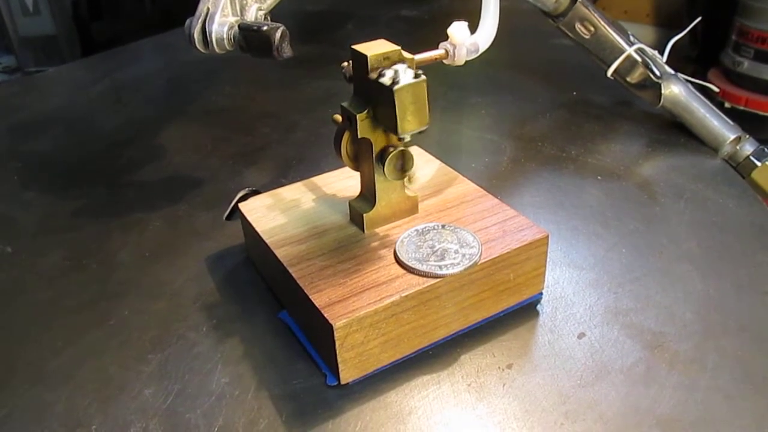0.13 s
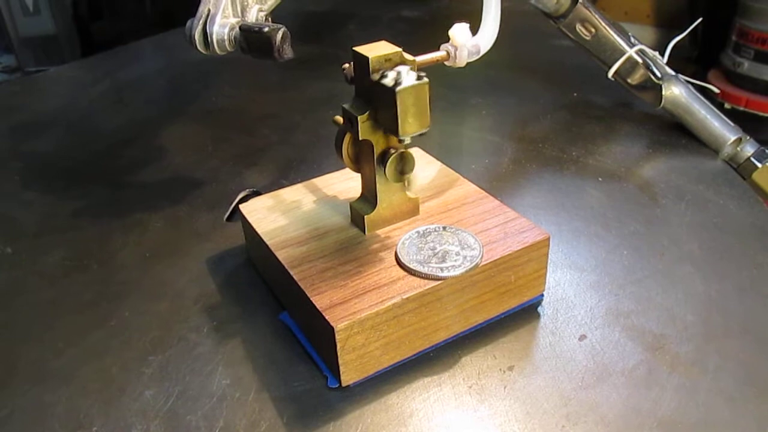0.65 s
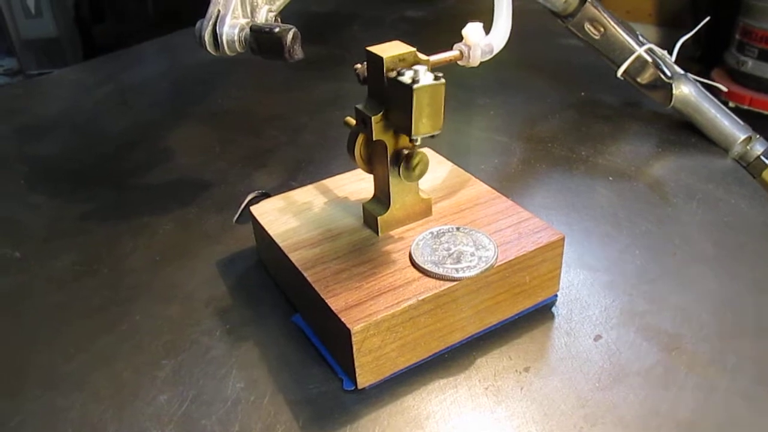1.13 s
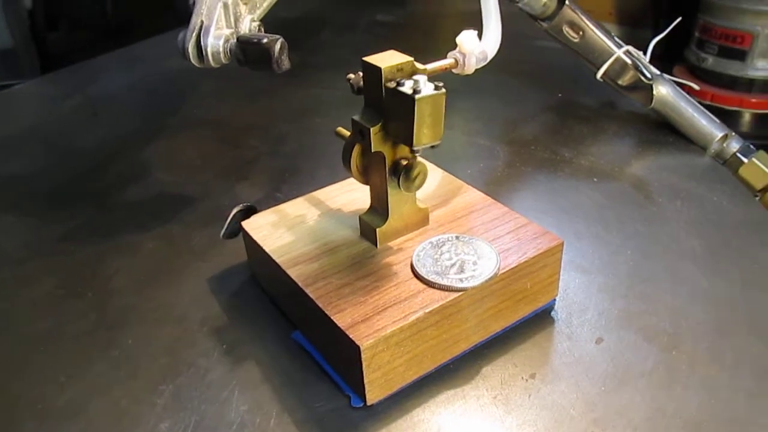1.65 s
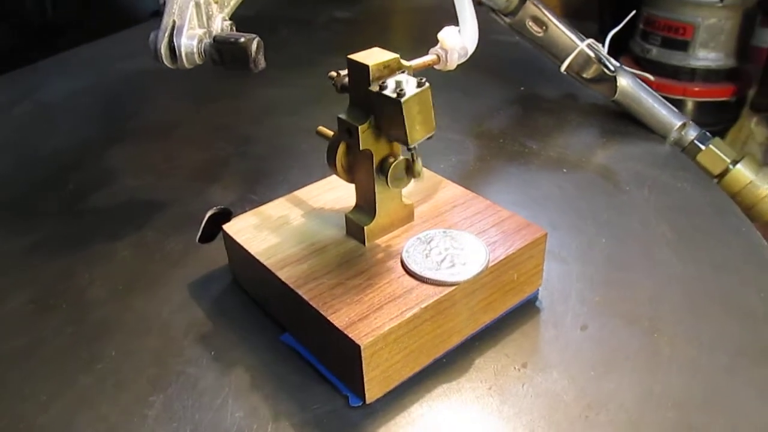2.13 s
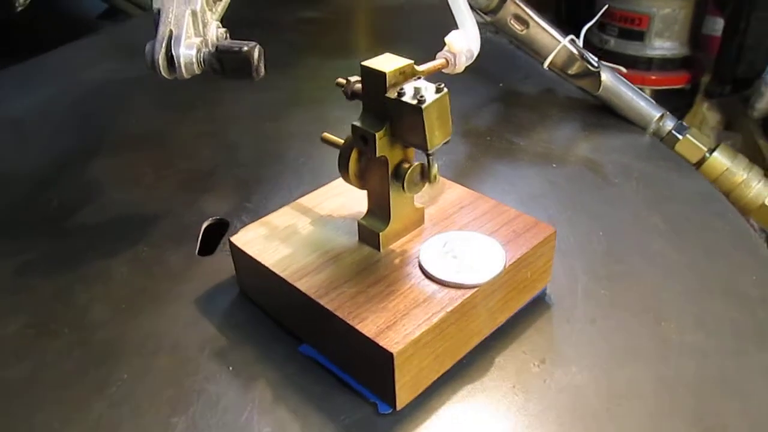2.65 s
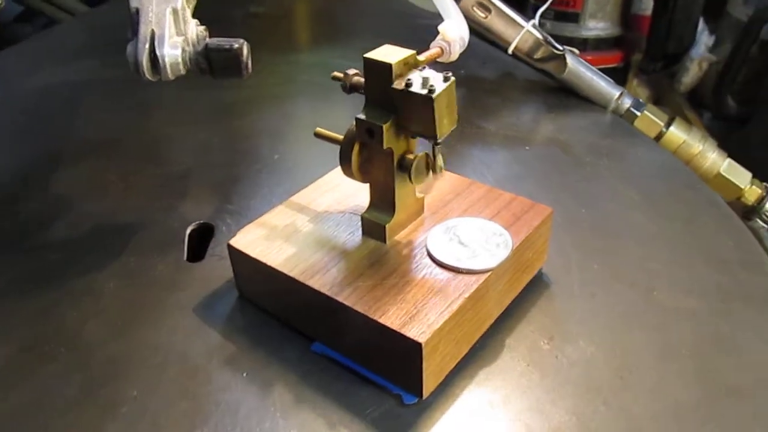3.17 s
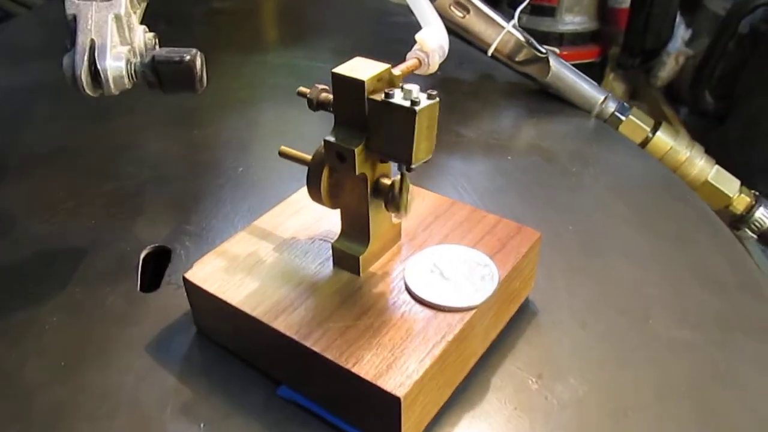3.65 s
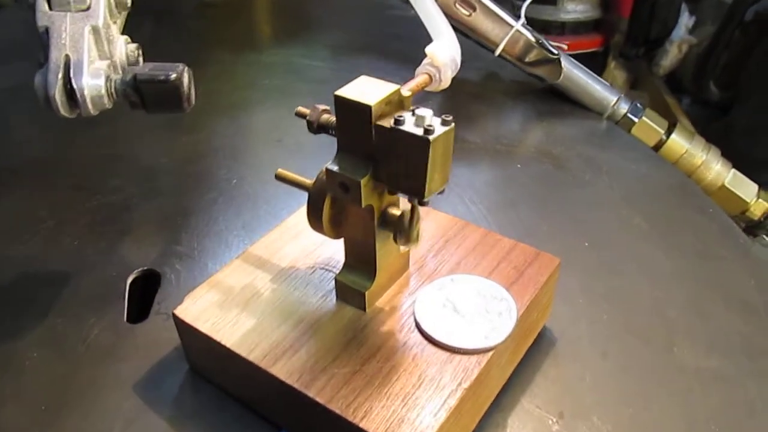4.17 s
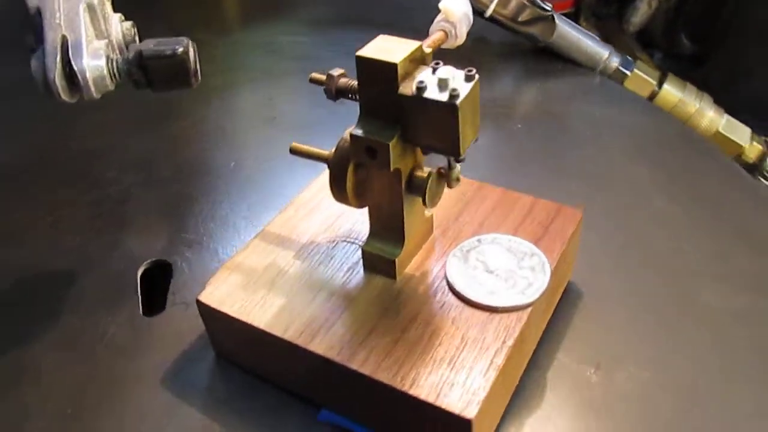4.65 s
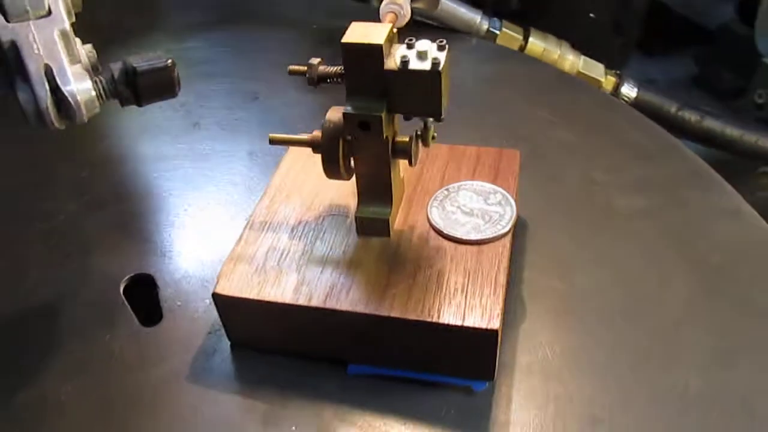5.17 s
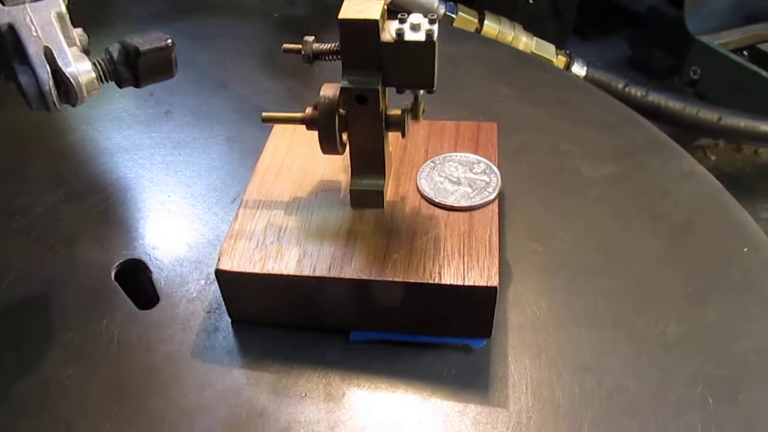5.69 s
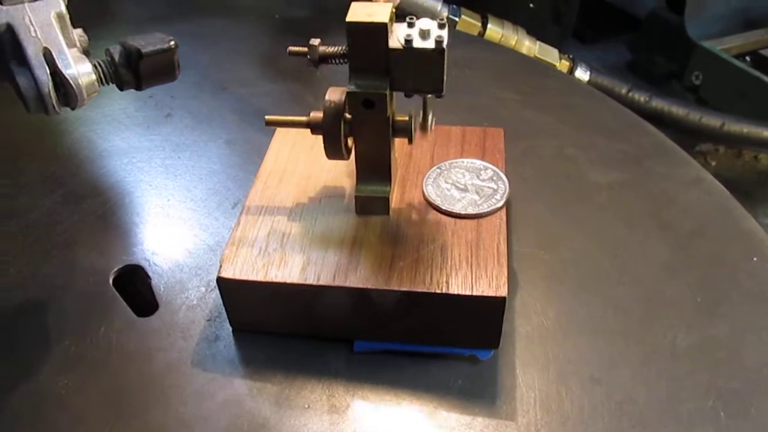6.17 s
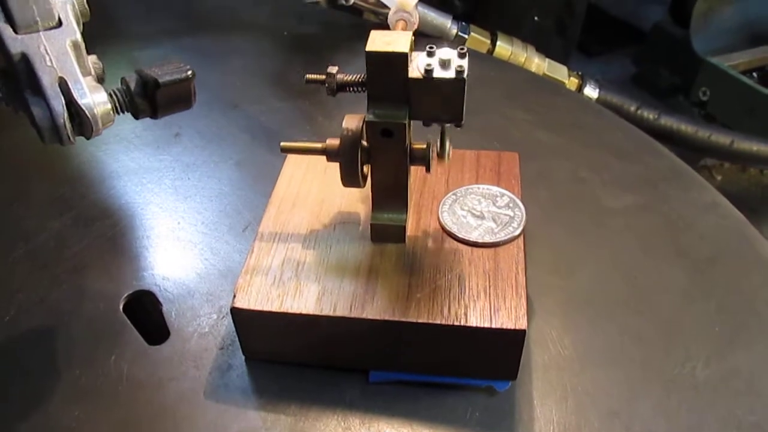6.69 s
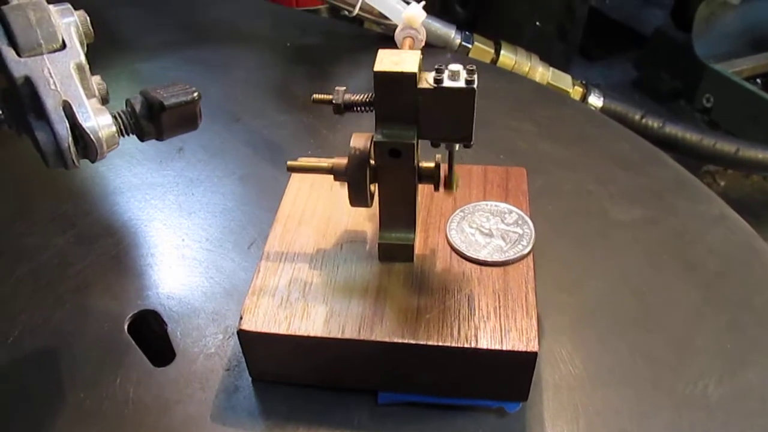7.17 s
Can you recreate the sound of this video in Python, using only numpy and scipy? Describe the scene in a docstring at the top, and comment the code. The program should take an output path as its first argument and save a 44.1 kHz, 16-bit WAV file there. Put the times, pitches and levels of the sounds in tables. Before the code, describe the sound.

Rapid dry clicking and sizzling high-pitched air exhaust from a miniature brass engine on a wood block, steady throughout, with quiet low room rumble.

```python
"""From the start a tiny oscillating-cylinder engine on a wooden block runs on compressed air, near ten
turns a second: noise hisses from its ports in crank-timed puffs, and struck modes ring at three knocks
a turn, some standing out. Under it lie room noise, mains hum sines, a resonant rumble and a faint far motor.
The listener walks from near the cylinder side past a corner towards the front. From 3.3 s four dull
bumps ring; from 4.2 s the motor, two orders over a noise roar, speeds up as the rumble fades."""
import sys
import numpy as np
from scipy import signal
from scipy.fft import rfft, irfft, next_fast_len
from scipy.io import wavfile
from scipy.ndimage import uniform_filter1d, map_coordinates

SR = 44100
rng = np.random.default_rng(int(sys.argv[2]) if len(sys.argv) > 2 else 0)


def waveform_to_disk(signal):
    """Save audio, clipped to [-1, 1], as 16-bit WAV at the path in sys.argv[1]."""
    frames = np.transpose(np.atleast_2d(signal))
    scaled = np.clip(frames, -1, 1) * 32767
    samples = np.round(scaled).astype(np.int16)
    wavfile.write(sys.argv[1], SR, samples)


def invert_db(level):
    """Linear amplitude ratio for a level in decibels (20 dB per decade), elementwise."""
    return 10 ** (np.asarray(level, dtype=float) / 20)


N = 322371


def time_s():
    """Seconds of every sample."""
    return np.arange(N) / SR


def rms_one(x):
    """Scale to rms 1."""
    return x / np.sqrt(np.mean(x ** 2) + 1e-20)


def in_time(rows):
    """Columns of a curve at every sample."""
    s, *columns = np.transpose(rows)
    return [np.interp(time_s(), s, c) for c in columns]


def grid_hz():
    """Frequencies of the FFT grid."""
    return np.fft.rfftfreq(next_fast_len(N), 1 / SR)


def at_hz(points):
    """A spectrum table on the FFT grid, interpolated over log frequency."""
    hz, value = np.transpose(points)
    return np.interp(np.log(grid_hz() + 1), np.log(hz + 1), value)


def shaped(x, response):
    """Filter by a response on the FFT grid."""
    return irfft(rfft(x, next_fast_len(N)) * response, next_fast_len(N))[..., :N]


def drift(rate_hz):
    """Slow chance of spread 1: noise through a double one-pole lowpass."""
    r = np.exp(-2 * np.pi * rate_hz / SR)
    return rms_one(signal.lfilter([1], [1, -2 * r, r * r], rng.standard_normal(N + SR))[SR:])


def ring(x, hz, t60_s):
    """A two-pole mode: a unit click sets a decaying sine of height 1 ringing."""
    r, w = invert_db(-60 / (t60_s * SR)), 2 * np.pi * hz / SR
    return signal.lfilter([0, np.sin(w)], [1, -2 * r * np.cos(w), r * r], x + 1e-18)


def clicks(s, size):
    """Unit clicks of given sizes at given seconds."""
    out, at = np.zeros(N), np.round(np.asarray(s) * SR).astype(int)
    inside = (at >= 0) & (at < N)
    np.add.at(out, at[inside], size[inside])
    return out


# Left-right likeness. Each row: frequency in Hz, likeness 0-1.
LIKENESS = [(40, 0.8), (130, 0.96), (290, 0.9), (640, 0.69), (1400, 0.77), (3100, 0.97), (5000, 0.74),
            (8000, 0.93), (15000, 0.9)]


def loosen(a, b):
    """Mix two unrelated signals as mid and side to a pair whose likeness follows the table."""
    alike = np.clip(at_hz(LIKENESS), 0, 1)
    mid = shaped(a, np.sqrt((1 + alike) / 2))
    side = shaped(b, np.sqrt((1 - alike) / 2))
    return mid + side * [[1], [-1]]


# Listener. Each row: time in seconds, bearing (0 cylinder side, 1 corner, 2 front), hiss rms in dB.
WALK = [(0, 0.26, -20), (1, 0.21, -20.5), (2, 0.31, -21), (2.6, 0.36, -20.5), (3.3, 0.51, -20),
        (4, 0.98, -20.5), (4.6, 1.04, -19.5), (5.2, 1.5, -19.5), (5.8, 1.6, -19.5), (6.5, 1.63, -19.5),
        (7.31, 1.67, -20)]
# Left minus right, a list per bearing. Each row: frequency in Hz, difference in dB.
LEFT_DB = [
    [(60, 2), (99, 2), (160, -1), (270, -3), (450, 0), (740, -1), (1220, 1.5), (2010, -6), (3330, 0),
     (5500, -2), (9080, 5), (15000, -1)],
    [(60, -1), (99, -5), (160, -2.0), (270, 1), (450, -2.5), (740, 0), (1220, 1.5), (2010, -7), (3330, -4),
     (5500, 0.5), (9080, 4), (15000, 1)],
    [(60, 6), (99, -17), (160, -25), (270, -16), (450, 5), (740, -4), (1220, -2), (2010, -10.5), (3330, -3),
     (5500, -2.5), (9080, 2.0), (15000, -2)],
]
# Phase lead of left over right, a list per bearing. Each row: frequency in Hz, lead in radians.
LEFT_LEADS = [
    [(0, 2.1), (5250, 0.38), (5770, -3), (6550, -0.1), (9730, 0.79), (10900, 0.4), (12800, 1), (16100, 1.5)],
    [(0, 0.063), (1890, -0.57), (5000, 0.88), (5430, -0.024), (9560, 0.8), (10300, 0.94), (10900, 0.28),
     (16100, 0.19)],
    [(0, 0.074), (1720, -0.29), (3100, 0.64), (8010, 0.36), (9470, 0.83), (10100, -1.2), (10700, -0.75),
     (16100, -0.4)],
]


def heard_from_walk(pair, colours):
    """Each bearing has its own colour, balance and lead; the walk fades between them."""
    bearing = np.clip(in_time(WALK)[0], 0, 2)
    spectrum = rfft(pair, next_fast_len(N))
    out = 0
    for k, colour in enumerate(colours):
        side = invert_db(at_hz(LEFT_DB[k]) / 2) * np.exp(.5j * at_hz(LEFT_LEADS[k]))
        view = irfft(spectrum * colour * np.array([side, 1 / side]), next_fast_len(N))[:, :N]
        out = out + np.clip(1 - abs(bearing - k), 0, 1) * view
    return out


# Crank passing top centre, every fifth turn. Each entry: time in seconds.
CRANK_S = [0.012, 0.5348, 1.0566, 1.5756, 2.092, 2.6127, 3.1363, 3.6642, 4.1883, 4.7044, 5.2206, 5.7334,
           6.2477, 6.768, 7.2862]
TURNS_PER_MARK = 5


def top_centres():
    """Seconds at which each turn begins, smooth through the marks, with one more turn at either end."""
    marks = np.r_[2 * CRANK_S[0] - CRANK_S[1], CRANK_S, 2 * CRANK_S[-1] - CRANK_S[-2]]
    index = np.arange(len(marks))
    steady = np.polyval(np.polyfit(index, marks, 1), index)
    at = 1 + np.arange(-1, (len(CRANK_S) - 1) * TURNS_PER_MARK + 2) / TURNS_PER_MARK
    wander = map_coordinates(marks - steady, [at], order=3, mode="nearest")
    return np.interp(at, index, steady) + wander


def echoes(rows):
    """Response of the direct sound plus a few early reflections, per channel."""
    return 1 + sum(np.outer([left, right], np.exp(-2j * np.pi * grid_hz() * ms / 1000))
                   for ms, left, right in rows)


# Puffs at the ports. Each row: centre in turns, length in turns, pitch at centre in Hz,
# glide in octaves per turn, width in octaves.
PUFFS = [(-.03, .04, 9600, 8, .22), (.03, .08, 10800, 0, .3), (.04, .012, 5300, 0, .14),
         (.165, .013, 9000, 0, .5), (.56, .045, 10500, 0, .35), (.59, .013, 12500, 0, .45),
         (.72, .025, 6600, -2, .2), (.7, .07, 10500, 0, .3), (.8, .13, 14500, 0, .3),
         (.85, .12, 5600, 0, .4)]
# Mean puff strength. Each entry: dB over the steady leak.
PUFF_DB = [7.7, 5.3, 4.5, 6.7, 4.2, 4.2, 4.1, 1.4, 0.33, 0.26]
# Hiss colour, a list per bearing. Each row: frequency in Hz, relative level in dB.
HISS = [
    [(2350, -47), (4000, -19), (4850, -22.5), (6100, -19), (7190, -12), (7920, -4), (9030, -1),
     (10200, 1.5), (10500, -1), (11000, -4.5), (11900, -5), (13200, -18.5), (14800, -12.5), (15600, -22)],
    [(2350, -35.5), (4000, -17.5), (4280, -23.5), (4830, -24.5), (5200, -22), (5440, -18), (6530, -6),
     (8060, -6.5), (8580, -5), (9720, -2.5), (10400, -0.5), (11000, -1), (12700, -5), (15600, -12.5)],
    [(2350, -45), (4000, -16), (5020, -27), (5380, -13.5), (5730, -19), (6340, -9), (6870, -8),
     (8240, -3.5), (9240, -5.5), (9950, 0), (10600, 1.5), (13900, -11), (15600, -17)],
]
# Block, frame and bench reflecting the hiss, a list per bearing.
# Each row: delay in ms, share left, share right (of the direct sound).
REFLECTIONS = [
    [(0.405, 0.15, 0.02), (0.68, 0.18, 0.17), (1.015, -0.01, -0.18), (1.26, 0.03, 0.13)],
    [(0.61, 0.06, -0.05), (0.76, -0.17, -0.05), (0.96, -0.07, -0.03), (1.355, 0.08, -0.02)],
    [(0.425, -0.06, -0.13), (0.545, -0.09, -0.07), (0.75, -0.09, -0.04), (1.345, 0.05, 0.1)],
]


def air(puff_spread_db=0.22, flutter_db=0.57):
    """A steady leak plus puffs: bumps of power in crank angle and pitch, a little different every turn."""
    s = top_centres()
    stft = dict(fs=SR, nperseg=128, noverlap=96)
    hz, t, cells = signal.stft(rng.standard_normal((2, N)), **stft)
    turn = np.interp(t, s, np.arange(len(s)))
    octave = np.log2(hz + 1)[:, None]
    power = 1   # the leak
    luck = rng.standard_normal((len(s) + 3, len(PUFFS)))
    for k, ((centre, length, puff_hz, glide, width), db) in enumerate(zip(PUFFS, PUFF_DB)):
        nearest = np.round(turn - centre)
        away = turn - centre - nearest
        pitch = np.exp(-.5 * ((octave - np.log2(puff_hz) - glide * away) / width) ** 2)
        strength = invert_db(2 * (db + puff_spread_db * luck[nearest.astype(int), k]))
        power = power + strength * np.exp(-.5 * (away / length) ** 2) * pitch
    a, b = signal.istft(cells * np.sqrt(power), **stft)[1][:, :N]
    flutter = invert_db(flutter_db * drift(400) + 0.53 * drift(48))   # turbulence makes the jet grainy
    # puffs shape time only: their mean lift at each pitch is divided out
    flat = invert_db(at_hz(np.c_[hz, -10 * np.log10(power.mean(1))]))
    colours = [flat * invert_db(at_hz(c)) * echoes(e) for c, e in zip(HISS, REFLECTIONS)]
    jet = heard_from_walk(loosen(a * flutter, b * flutter), colours)
    level = np.sqrt(uniform_filter1d(np.mean(jet, 0) ** 2, SR // 2))
    return invert_db(in_time(WALK)[1]) * jet / level


# Levels of the linkage are blow strengths, ahead of the mode levels.
MAIN_DB, MAIN_SPREAD_DB, MAIN_SCATTER_MS = -19.5, 0.6, 0.6
REBOUND_MS, REBOUND_SPREAD_DB, REBOUND_SCATTER_MS = 7.9, 2.0, 0.6
RETURN_TURNS, RETURN_SPREAD_DB, RETURN_SCATTER_MS = 0.468, 1.5, 0.4
# Usual strength from each bearing. Each entry: level in dB.
REBOUND_DB = [-26.5, -26, -28.5]
RETURN_DB = [-28, -24.5, -24.5]
# Main knocks harder than the rest. Each row: time in seconds, level in dB.
HARD_KNOCKS = [(0.2208, -15.5), (0.3257, -16.5), (0.9516, -18.5), (1.2659, -16.5), (1.37, -10.5),
               (1.885, -18), (2.1966, -16), (2.301, -18.5), (2.5091, -17), (3.0309, -18.5), (3.9796, -18.5),
               (4.2916, -15), (4.6022, -17.5), (4.705, -14), (5.1183, -15.5), (5.2202, -16), (5.733, -18.5),
               (6.1448, -16), (6.2478, -18.5)]
# Rebounds that stand out, hard or faint. Each row: time in seconds, level in dB.
ODD_REBOUNDS = [(0.0192, -23.5), (0.5423, -20.5), (1.0646, -23), (1.3785, -31), (3.1456, -23),
                (3.5675, -24.5), (4.299, -22), (5.1263, -23), (5.229, -33), (5.5326, -36), (5.637, -40)]
# Return knocks that stand out, hard or faint. Each row: time in seconds, level in dB.
ODD_RETURNS = [(0.375, -23.5), (1.1078, -42), (1.3152, -24), (1.5218, -21.5), (1.6243, -24), (1.831, -24.5),
               (3.187, -23), (3.3974, -23), (3.7136, -21), (3.9243, -22.5), (4.855, -23.5), (5.2681, -21.5),
               (5.9867, -24.5), (6.0888, -32), (6.4007, -22), (6.9198, -33), (7.231, -22)]


def linkage():
    """Times and strengths of three knocks a turn: main at top centre, its rebound, the return knock."""
    edges = top_centres()
    s, turn_s = edges[1:-1], np.diff(edges)[1:]
    luck = rng.standard_normal((len(s), 6))
    bearing = np.interp(s, *np.transpose(WALK)[:2])
    rebound_db = np.interp(bearing, np.arange(3), REBOUND_DB)
    return_db = np.interp(bearing, np.arange(3), RETURN_DB)
    main = [s + MAIN_SCATTER_MS * luck[:, 0] / 1000, MAIN_DB + MAIN_SPREAD_DB * luck[:, 1]]
    rebound = [s + (REBOUND_MS + REBOUND_SCATTER_MS * luck[:, 2]) / 1000,
               rebound_db + REBOUND_SPREAD_DB * luck[:, 3]]
    back = [s + RETURN_TURNS * turn_s + RETURN_SCATTER_MS * luck[:, 4] / 1000,
            return_db + RETURN_SPREAD_DB * luck[:, 5]]
    # the outstanding ones replace the nearest knock of their kind
    for (at, db), odd in ((main, HARD_KNOCKS), (rebound, ODD_REBOUNDS), (back, ODD_RETURNS)):
        for odd_s, odd_db in odd:
            k = np.argmin(abs(at - odd_s))
            at[k], db[k] = odd_s, odd_db
    return main, rebound, back


# Scuffs around the return knock. Each row: offset in ms, level in dB ahead of the mode levels.
SCUFFS = [(-9, -31), (13, -37)]


def scuffs(back_s):
    """Faint clicks as slack is taken up around the return knock, scattered in time and level."""
    slack = rng.standard_normal((len(back_s), 2 * len(SCUFFS)))
    out = np.zeros(N)
    for k, (ms, db) in enumerate(SCUFFS):
        when = back_s + ms / 1000 + 0.0016 * slack[:, 2 * k]
        out += clicks(when, invert_db(db + 3.0 * np.clip(slack[:, 2 * k + 1], -2, 1)))
    return out


MODE_SPREAD_DB = 1.2
# Block boom modes. Each row: frequency in Hz, t60 in seconds,
# peak in dB for main knock, for rebound, for return knock (ahead of the walk's colour).
BOOM = [(316.7, 0.077, -67, -52.5, -56), (382, 0.043, -60, -45.5, -49), (680, 0.019, -57.5, -56.5, -85),
        (1047, 0.027, -49.5, -50.5, -58), (1125, 0.048, -58, -64, -70)]


def boom(back_s, chances):
    """The block booms evenly on the bench: modes rung twice, so they swell after a knock."""
    top = top_centres()[1:-1]
    even = top, top + REBOUND_MS / 1000, back_s
    out = np.zeros(N)
    for m, (hz, t60_s, *boom_db) in enumerate(BOOM):
        drive = sum(clicks(at - .0015, invert_db(db + .5 * MODE_SPREAD_DB * chance[:, m]))
                    for at, db, chance in zip(even, boom_db, chances))
        peak_one = 2 * np.e * np.log(1000) / (t60_s * SR)
        out += ring(ring(drive, hz, t60_s), hz, t60_s) * peak_one
    return out


# Modes of frame and wooden base. Each row: frequency in Hz, t60 in seconds.
BODY = [(1060, .012), (1295, .04), (1550, .01), (1780, .012), (2050, .016), (2450, .009), (2800, .009),
        (3100, .01), (3420, .012), (3750, .009), (4300, .008), (4850, .009), (5500, .009), (6200, .007)]
# Strike on each mode. Each row: dB for main knock, for rebound, for return knock.
STRIKE_DB = [(-26.5, -22.5, -46), (-28, -26, -36), (-20.5, -10.5, -35), (-12, -11.5, -30), (-14, -12, -9),
             (-12.5, -7, -11), (-7.5, -2.5, -9.5), (-3.5, 1, -4), (-3, 2, -1.5), (-8.5, -6, -15),
             (-15.5, -18, -35), (-13, -11.5, -11.5), (-10, -26, -8), (-16, -29, -13)]
# Touches making up one knock, the blow first. Each row: offset from the peak in ms, scatter in ms, level in dB.
RATTLE = [(-0.92, .05, 0), (-2, .2, -5), (-3, .3, -8.5), (1.75, .5, -15.5), (3.4, 0.89, -24)]
WORKSHOP_T60_S, WORKSHOP_DB = 0.067, -9
# Knock colour, a list per bearing. Each row: frequency in Hz, level in dB.
KNOCK_COLOUR = [
    [(1000, -0.5), (2500, -1.5), (4000, 0), (5300, 1.5)],
    [(1000, 0.5), (2500, 0), (4000, 0), (5300, 1)],
    [(1000, 2), (2500, 0.5), (4000, -1.5), (5300, -14.5)],
]


def knocks():
    """Every knock is a rattle of touches around one blow, striking the modes a little differently."""
    kinds, out = linkage(), np.zeros(N)
    # columns of chance: body modes, boom modes, then level and time of each touch
    luck = [rng.standard_normal((len(at), len(BODY) + len(BOOM) + 2 * len(RATTLE))) for at, db in kinds]
    back_s = kinds[2][0]
    slack_clicks = scuffs(back_s)
    for m, ((hz, t60_s), share_db) in enumerate(zip(BODY, STRIKE_DB)):
        sign = (-1) ** m
        drive = sign * invert_db(share_db[2]) * slack_clicks
        for (at, db), share, chance in zip(kinds, share_db, luck):
            size = sign * invert_db(db + share + MODE_SPREAD_DB * chance[:, m])
            for k, (ms, scatter_ms, touch_db) in enumerate(RATTLE):
                when = at + (ms + scatter_ms * chance[:, -1 - 2 * k]) / 1000
                spread_db = (k > 0) * 2.2   # the blow itself keeps its level
                drive += clicks(when, size * invert_db(touch_db + spread_db * chance[:, -2 - 2 * k]))
        out += ring(drive, hz, t60_s)
    out += boom(back_s, [chance[:, len(BODY):] for chance in luck])
    pair = out + invert_db(WORKSHOP_DB) * workshop(out)
    return heard_from_walk(pair, [invert_db(at_hz(c)) for c in KNOCK_COLOUR])


def workshop(x):
    """Short reverberation: a decaying noise tail for each channel."""
    t = np.arange(SR // 2) / SR
    tail = rng.standard_normal((2, SR // 2)) * invert_db(-60 * t / WORKSHOP_T60_S)
    return signal.fftconvolve(x[None], tail / np.sqrt(np.sum(tail[0] ** 2)), axes=1)[:, :N]


# Room noise spectrum. Each row: frequency in Hz, relative density in dB per Hz.
ROOM_AIR = [(12, -41), (20, 15.5), (123, -0.5), (175, -10), (234, -5), (283, -14.5), (377, -4), (467, -17),
            (868, -16), (1030, -15.5), (1600, -11), (2000, -8.5), (2540, -8.5), (3380, -3.5), (4840, -41.5),
            (6000, -17), (7800, -24), (13200, -120)]
ROOM_AIR_DB = -43   # rms ahead of the walk's balance


def room_air():
    """Broad background of the workshop: shaped noise."""
    pair = loosen(*shaped(rng.standard_normal((2, N)), invert_db(at_hz(ROOM_AIR))))
    return heard_from_walk(invert_db(ROOM_AIR_DB) * rms_one(pair), [1, 1, 1])


# Mains lines. Each row: frequency in Hz, rms in dB ahead of waver and side balance.
HUM = [(120, -46), (240, -55.5)]


def hum():
    """Mains sines that waver a little, louder and 22 samples later on the right."""
    lines = 0
    for hz, db in HUM:
        level = invert_db(db + .5 * drift(1.1)) * np.sqrt(2)
        lines = lines + level * np.sin(2 * np.pi * (hz * time_s() + rng.random()))
    late = np.r_[np.zeros(22), lines[:-22]]
    return np.array([lines, late]) * invert_db([[-1.2], [1.2]])


RUMBLE_HZ, RUMBLE_WIDTH_HZ = 37.4, 4.5
# Rumble level. Each row: time in seconds, level in dB.
RUMBLE = [(0.0, -38.5), (0.9, -40.5), (2.8, -41.5), (4.05, -45), (5.1, -56), (7.31, -54)]


def rumble():
    """Low room rumble: noise through one narrow resonance, alike in both channels."""
    noise = rng.standard_normal(N + SR)
    return invert_db(in_time(RUMBLE)[0]) * rms_one(ring(noise, RUMBLE_HZ, 1.6 / RUMBLE_WIDTH_HZ)[SR:])


ORDER_DB = -64   # each order between swells, ahead of the motor's nearness and drift


def swells(rows):
    """A steady level with bell-shaped swells on top."""
    return invert_db(ORDER_DB) + sum(invert_db(db) * np.exp(-.5 * ((time_s() - s) / length_s) ** 2)
                               for s, length_s, db in rows)


# Far motor. Each row: time in seconds, firing rate in Hz, roar level in dB.
MOTOR = [(4.2, 40, -61), (5.2, 45.15, -58), (5.6, 51.2, -54.5), (6.2, 58, -55), (7, 67.8, -54.5),
         (7.3, 70.1, -52)]
# Brief swells of each order. Each row: time in seconds, length in seconds,
# level in dB ahead of the motor's nearness and drift.
FOURTH_SWELLS = [(5.4, 0.08, -48), (5.82, 0.09, -50), (6.8, 0.091, -56)]
FIFTH_SWELLS = [(5.2, 0.069, -51), (5.97, 0.062, -52.5), (6.22, 0.044, -43), (6.37, 0.09, -54),
                (7.0, 0.088, -51)]


def far_motor():
    """Two unsteady orders of a firing rate that climbs, over a dull roar."""
    hz, roar_db = in_time(MOTOR)
    angle = 2 * np.pi * np.cumsum(hz * (1 + 0.00672 * drift(3.7))) / SR
    fourth = swells(FOURTH_SWELLS) * invert_db(2 * drift(6.0)) * np.sin(4 * angle)
    fifth = swells(FIFTH_SWELLS) * invert_db(2 * drift(6.0)) * np.sin(5 * angle)
    near = invert_db(roar_db - roar_db.max())
    band = signal.butter(1, [70, 350], "band", fs=SR, output="sos")
    roar = signal.sosfilt(band, rng.standard_normal((2, N)))
    return np.sqrt(2) * near * (fourth + fifth) + invert_db(roar_db) * rms_one(loosen(*roar))


# Bumps. Each row: time in seconds, level of the main mode in dB, its frequency in Hz.
BUMPS = [(3.301, -41, 298), (4.561, -35, 334), (5.89, -39.5, 519), (6.641, -43, 680)]


def bumps():
    """Dull short thuds: three damped modes struck by one click."""
    out = np.zeros(N)
    for s, db, hz in BUMPS:
        hit = clicks([s], invert_db(np.array([db])))
        out += ring(hit, hz, .03) + .7 * ring(hit, hz * 1.5, .03) + .6 * ring(hit, hz * .72, .04)
    return out


def scene():
    """All sources together."""
    return air() + knocks() + room_air() + hum() + rumble() + far_motor() + bumps()


def low_pass(x):
    """Removes everything above the highest recorded frequency."""
    return signal.sosfilt(signal.butter(12, 16570, fs=SR, output="sos"), x)


NOTCH_HZ, NOTCH_WIDTH_HZ = 7867, 190
BASS_CUT_HZ, TOP_EDGE_HZ = 30, 15780


def record(dry):
    """The recorder has a bass cut, a narrow notch in the treble and a steep top edge."""
    notched = signal.lfilter(*signal.iirnotch(NOTCH_HZ, NOTCH_HZ / NOTCH_WIDTH_HZ, SR), dry)
    bass_cut = signal.butter(2, BASS_CUT_HZ, "high", fs=SR, output="sos")
    top_edge = signal.ellip(12, .5, 50, TOP_EDGE_HZ, fs=SR, output="sos")
    mix = signal.sosfilt(np.r_[bass_cut, top_edge], notched)
    return low_pass(mix)


dry = scene()
out = record(dry)
waveform_to_disk(out)
```